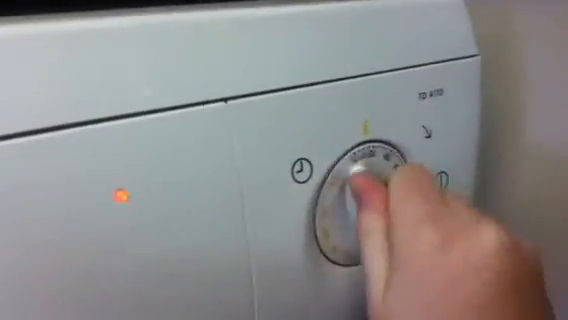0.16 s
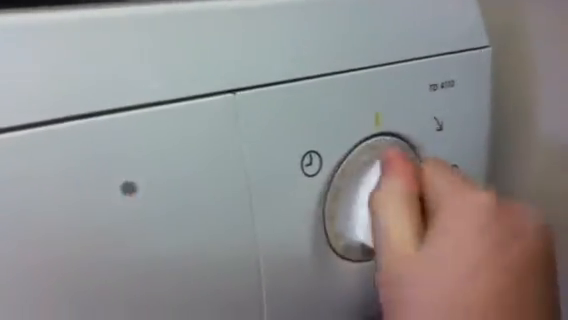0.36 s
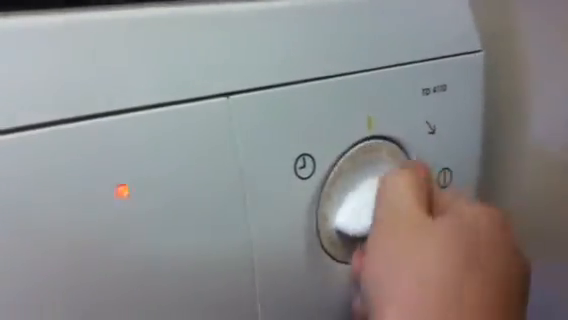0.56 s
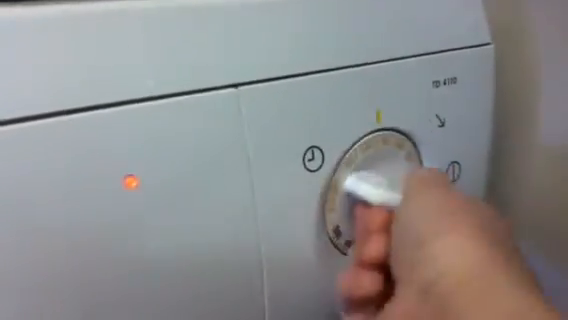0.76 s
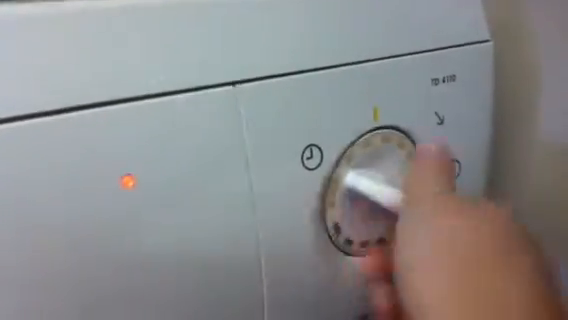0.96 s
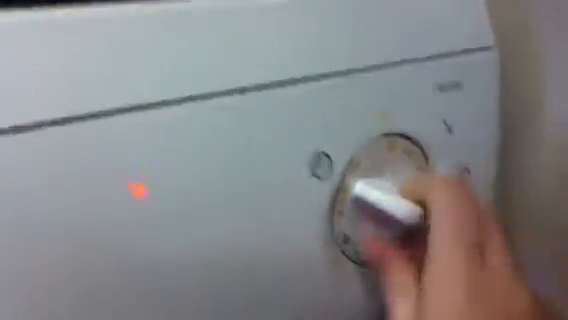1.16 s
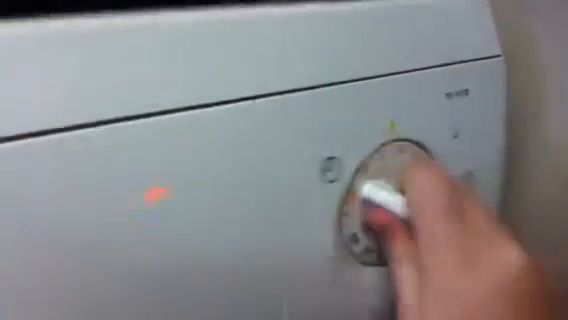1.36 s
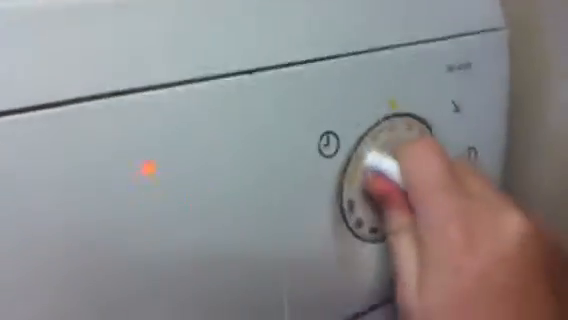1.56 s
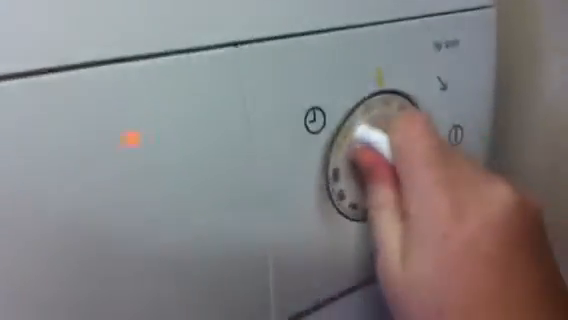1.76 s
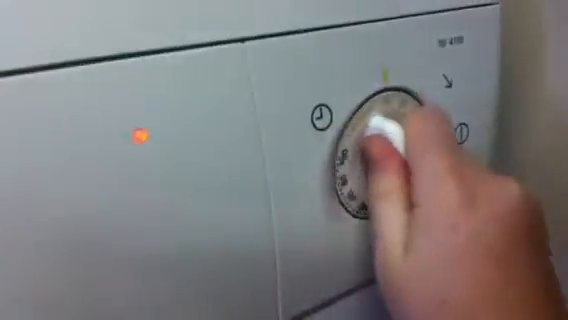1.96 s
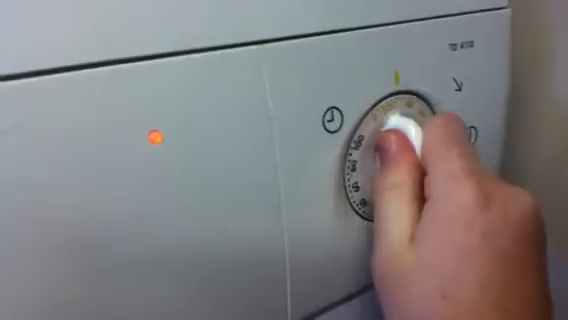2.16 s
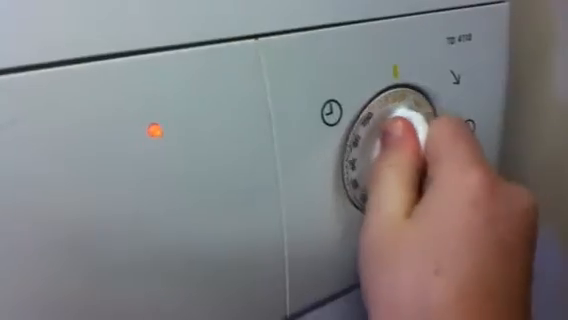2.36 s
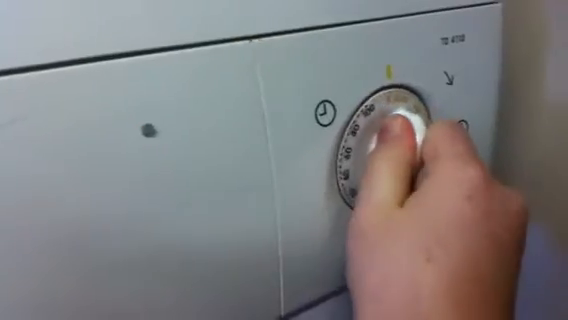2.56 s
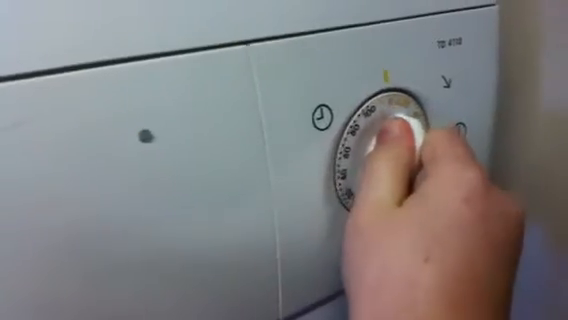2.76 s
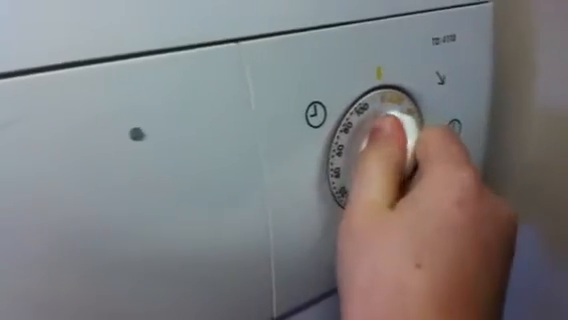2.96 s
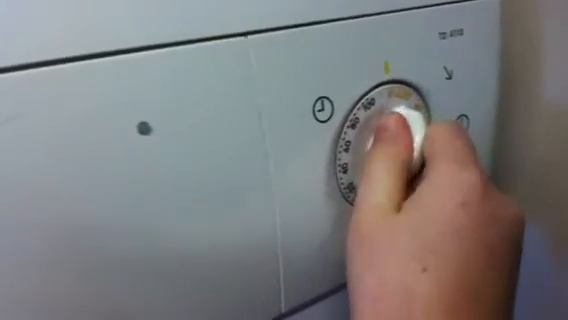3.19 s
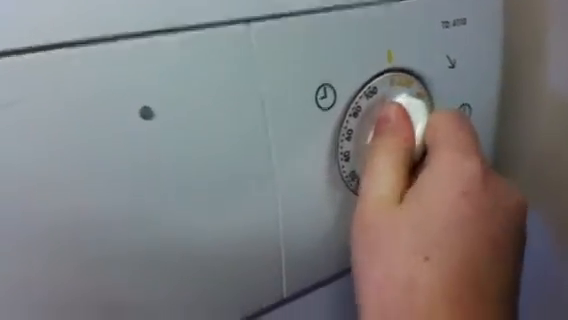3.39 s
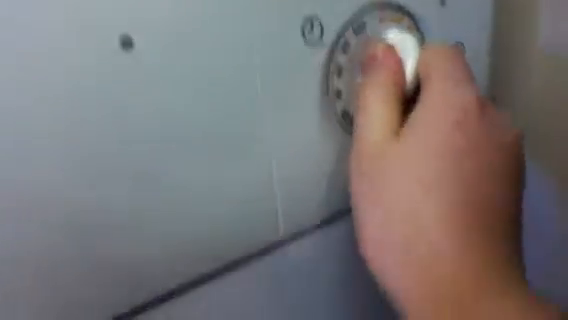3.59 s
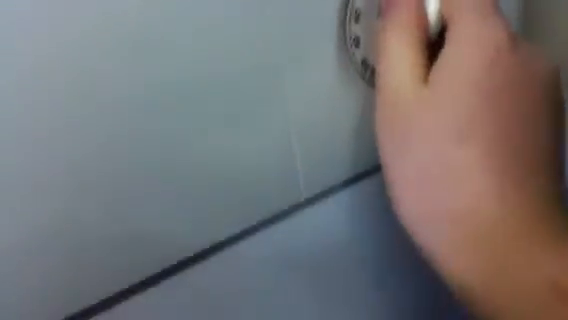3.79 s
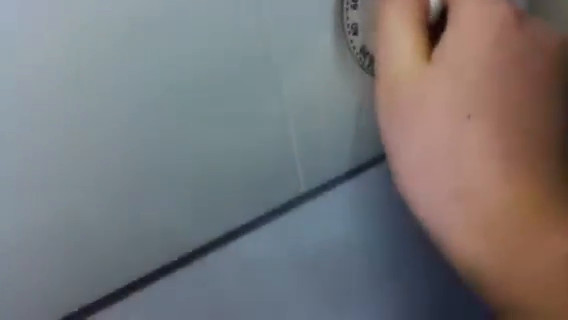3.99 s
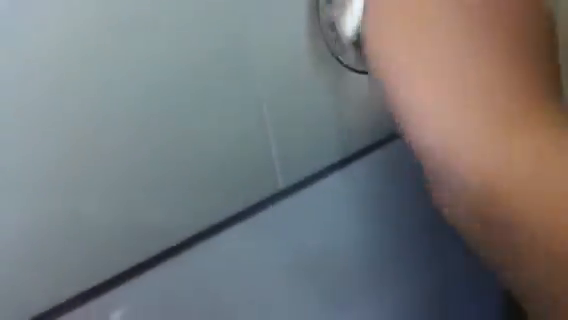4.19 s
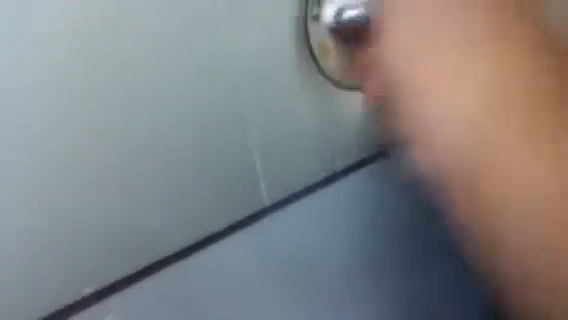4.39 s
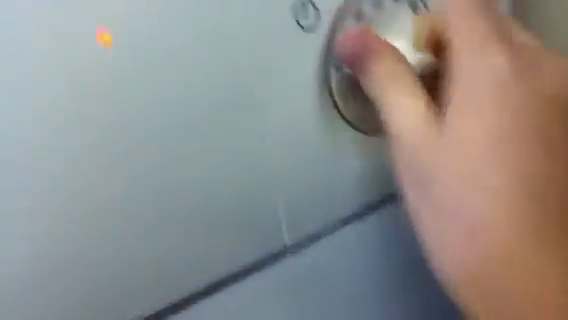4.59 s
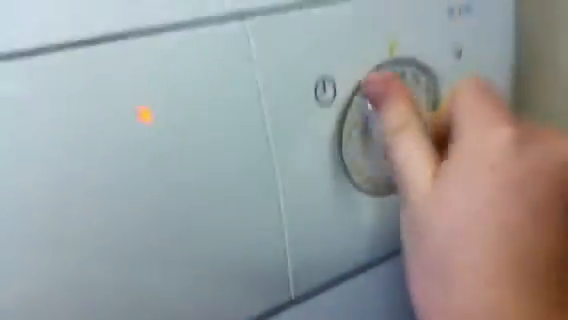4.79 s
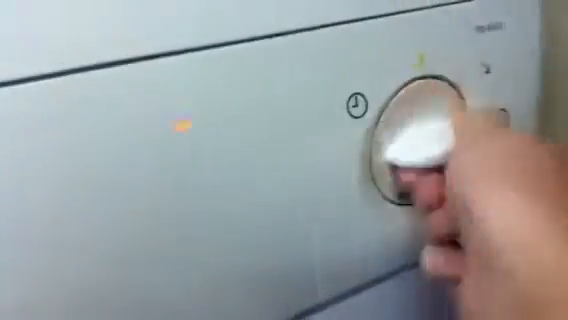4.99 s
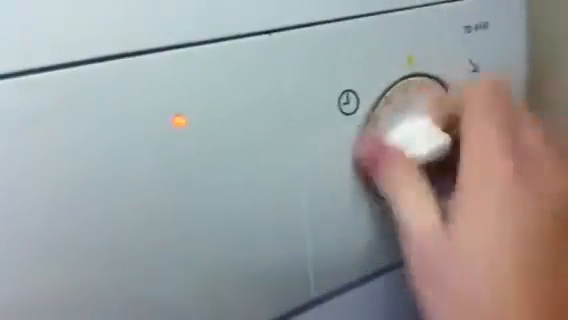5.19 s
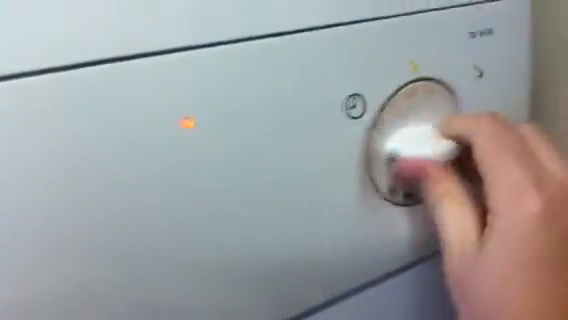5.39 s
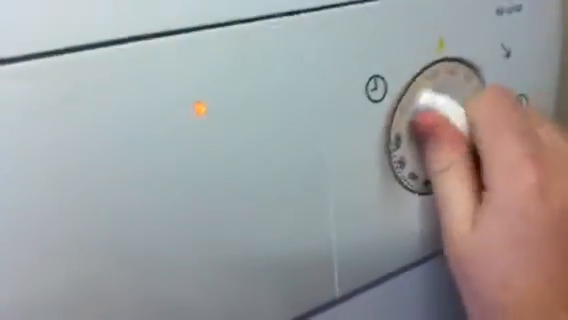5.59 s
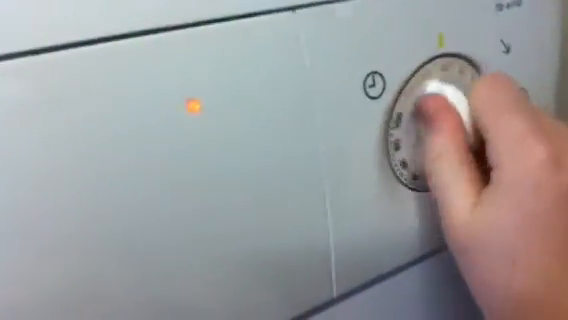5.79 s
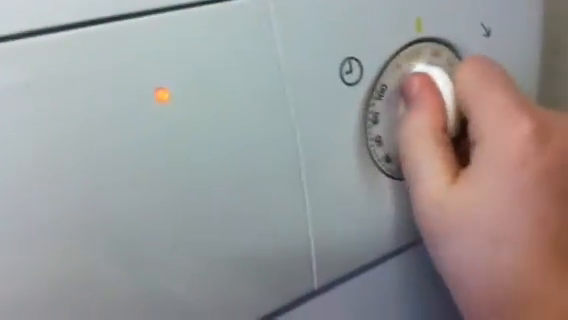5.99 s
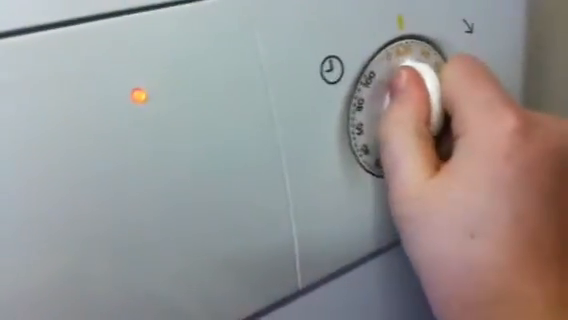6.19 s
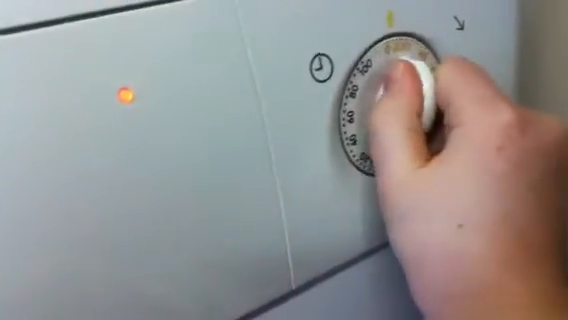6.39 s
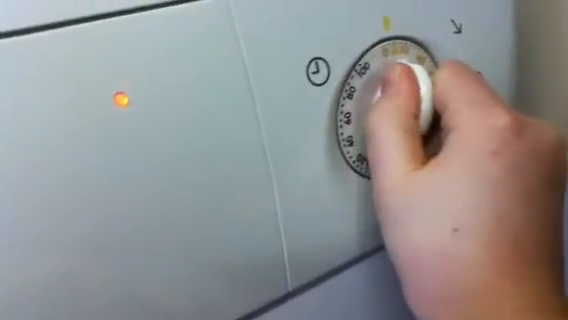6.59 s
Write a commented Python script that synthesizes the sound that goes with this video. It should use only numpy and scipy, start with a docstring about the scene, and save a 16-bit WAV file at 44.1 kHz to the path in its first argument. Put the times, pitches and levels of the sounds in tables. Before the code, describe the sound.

Close to a sheet-metal laundry appliance in a quiet room, fingers rub and tap a dial, then a rapid ratchet run clatters. After a regrip, slower, separate clicks end with one loud snap. A pause with only faint room hush follows, then very fast bursts of clicks alternate with rubs and taps, finally slowing to spaced clicks.

```python
"""Skin rubs a knob and two light finger taps land, in a quiet room; then a pawl clicks rapidly over ratchet teeth.
A hand is turning the timer dial of a sheet-metal laundry appliance, in single clicks and fast runs.
Each snap and tap excites noise bands and decaying modes that ring the knob, the panel and the cabinet.
Between turns the fingers slide and tap as they regrip: strokes are shaped noise, and so is the room.
A thin sine tone fades in once after a snap and dies slowly."""
import sys
import numpy as np
from scipy import signal
from scipy.fft import rfft, irfft, next_fast_len
from scipy.io import wavfile
from scipy.ndimage import map_coordinates

SR = 44100
rng = np.random.default_rng(int(sys.argv[2]) if len(sys.argv) > 2 else 0)


def to_linear_factor(level_db):
    """Convert decibel levels (scalar or array-like) to linear amplitude factors."""
    exponent = np.asarray(level_db, float) / 20
    return 10 ** exponent


def int16_out(signal):
    """Quantize to a 16-bit WAV file."""
    q = np.round(np.clip(np.atleast_2d(signal).T, -1, 1) * 32767)
    wavfile.write(sys.argv[1], SR, q.astype(np.int16))


N = 293265  # length in samples


def unit(x):
    """Scale x to rms 1."""
    return x / np.sqrt(np.mean(x ** 2) + 1e-20)


def hiss(spectrum):
    """Noise of rms 1, coloured by a curve of (frequency, level) points."""
    size = next_fast_len(N)
    hz, db = np.transpose(spectrum)
    bin_hz = np.fft.rfftfreq(size, 1 / SR)
    gain = to_linear_factor(np.interp(np.log(bin_hz + 1), np.log(hz), db, right=-120))
    white = rng.standard_normal(size)
    return unit(irfft(rfft(white) * gain, size)[:N])


def wobble(rate_hz):
    """Smooth random curve through rate_hz random knots a second."""
    knots = rng.standard_normal(int(N * rate_hz / SR) + 4)
    return map_coordinates(knots, [np.arange(N) * rate_hz / SR])


# Colour of the quiet room and microphone hiss: pitch_hz, relative_level_db (per Hz)
ROOM_COLOUR = [(15, -31), (25, -7.5), (53, -2), (76, -5), (326, -8.5), (416, -12), (503, -14.5),
               (1260, -20), (1400, -20), (3620, -26), (16000, -29)]


def room_hush():
    """Steady coloured noise of the still room, its level drifting slightly."""
    level_db = -59.5 + 0.6 * wobble(13)
    return to_linear_factor(level_db) * hiss(ROOM_COLOUR)


# Strokes of skin on the knob: start_s, end_s, rub_db and hiss_db (before trims), change_db (over the stroke)
STROKES = [(0.0, 0.123, -33, -45.5, -16), (1.0, 1.257, -42.5, -51, 1), (1.297, 1.6, -50, -56, 7),
           (4.11, 4.217, -57.5, -63, 3), (4.447, 4.54, -31, -34, -13), (4.562, 4.83, -42, -47.5, -2),
           (5.12, 5.304, -30, -54, -7), (5.34, 5.485, -45, -59, 2)]
# Colour of the dull rub: pitch_hz, relative_level_db (per Hz)
RUB_COLOUR = [(100, -7.5), (200, 7), (500, -5), (1200, -10), (2500, -15), (4000, -60.5)]
# Colour of the skin's faint hiss: pitch_hz, relative_level_db (per Hz)
SKIN_COLOUR = [(1000, -23.5), (2500, -6.5), (6000, -4.5), (10000, -15), (15000, -23.5)]


def skin_slides():
    """Skin drags unevenly over the knob: a dull rub and a faint hiss swell and sag together."""
    fade_s = 0.022  # before and after each stroke
    rub_uneven_db, hiss_uneven_db = 3.5, 1.5
    t, rub, fizz = np.arange(N) / SR, np.zeros(N), np.zeros(N)
    for start, end, rub_db, hiss_db, change_db in STROKES:
        edge = np.clip(np.minimum(t - start, end - t) / fade_s + 1, 0, 1)
        progress = np.clip((t - start) / (end - start), 0, 1)
        press = edge * to_linear_factor(change_db * progress)
        rub += press * to_linear_factor(rub_db)
        fizz += press * to_linear_factor(hiss_db)
    drag = wobble(60)
    dull = rub * to_linear_factor(-9.5 + rub_uneven_db * drag) * hiss(RUB_COLOUR)
    bright = fizz * to_linear_factor(-13 + hiss_uneven_db * drag) * hiss(SKIN_COLOUR)
    return dull + bright


def spread(rows, colour_db, lift_db):
    """Rows of time and the level each of the five parts receives, varying from blow to blow."""
    start_s, strength_db = np.transpose(rows)[:2]
    chance_db = 2 * rng.standard_normal((len(rows), len(colour_db)))
    return np.column_stack([start_s, strength_db[:, None] + colour_db + lift_db + chance_db])


# Where crack, pawl, knob, panel and cabinet sound: pitch_hz
PART_HZ = [7200, 4800, 1670, 635, 250]


def blows(rows, hz, scatter_db):
    """Impulse train of the blows' strength at one frequency, blended between the parts' levels."""
    level_db = [np.interp(-np.log(hz), -np.log(PART_HZ), parts) for s, *parts in rows]
    level_db = level_db + scatter_db * rng.standard_normal(len(rows))
    train = np.zeros(N)
    train[[round(row[0] * SR) for row in rows]] = to_linear_factor(level_db)
    return train


def dying(x, t60):
    """Each impulse of x becomes an exponential that falls to a thousandth in t60 seconds."""
    return signal.lfilter([1], [1, -to_linear_factor(-60 / (t60 * SR))], x)


# Dense rattle by band: pitch_hz, level_db, quick_t60_s (before hold), linger_db, linger_t60_s
RATTLE_BANDS = [(90, -21, 0.27, -14.5, 1), (206.4, 0.5, 0.017, -10.5, 0.94), (388, -0.5, 0.075, -13, 0.59),
                (764, -3, 0.13, -4, 0.36), (1510, 0, 0.11, -12, 0.29), (2450, -5, 0.026, -6.5, 0.24),
                (4470, -2, 0.094, -13, 0.19), (6637, -6, 0.049, -24.5, .2), (11300, -15, 0.066, -36.5, .16),
                (13500, -42, .03, -27, .14)]


def rattle(rows, spike_db, hold):
    """Countless close modes: noise in each band spikes, dies fast, then lingers in cabinet and room."""
    spike_s, rise_s = 0.028, 0.005
    width = 1.338  # band edges as a ratio to the centre
    out = np.zeros(N)
    # Power falls 30 dB where its envelope falls to a thousandth, hence the halved t60 values
    for hz, db, quick, late_db, late in RATTLE_BANDS:
        impact = blows(rows, hz, scatter_db=1.5) ** 2
        # Smear the blow so the rattle swells in instead of jumping
        power = dying(impact, rise_s) / (rise_s * SR / np.log(1000))
        treble_tilt = hz / (hz + 3000)  # the bare impact is bright
        spike = to_linear_factor(2 * spike_db) * treble_tilt * dying(power, spike_s / 2)
        quick_tail = dying(power, hold * quick / 2)
        late_tail = to_linear_factor(2 * late_db) * dying(power, late / 2)
        envelope = np.sqrt(spike + quick_tail + late_tail)
        edges = [hz / width, min(hz * width, SR * 0.45)]
        band = signal.butter(2, edges, "bandpass", fs=SR, output="sos")
        size = np.std(signal.sosfilt(band, rng.standard_normal(SR)))  # evens out bandwidths
        out += to_linear_factor(db) / size * signal.sosfilt(band, envelope * rng.standard_normal(N))
    return out


def mode(kicks, hz, t60):
    """One resonance: every kick starts a sine that decays by 60 dB in t60 seconds."""
    radius, turn = to_linear_factor(-60 / (t60 * SR)), 2 * np.pi * hz / SR
    return np.sin(turn) * signal.lfilter([1], [1, -2 * radius * np.cos(turn), radius * radius], kicks)


# Modes of dial and cabinet: pitch_hz, level_db, t60_s (before hold)
MODES = [(169.7, -9.5, 0.32), (201.9, -3, 0.24), (293.8, -10.5, 0.35), (347, -7.5, .3),
         (382.8, -13.5, 0.26), (451.6, -30, 1.6), (497.3, -16, 0.24), (612, -18, .6), (650.7, -4.5, 0.15),
         (802, -14, 0.032), (926, -14, 0.048), (1115, -10, 0.091), (1370, -13, 0.11), (1583, -9.5, 0.2),
         (1761, -12, 0.069), (1925, -4.5, 0.067), (2150, -8.5, 0.072), (2332, -10.5, 0.091),
         (2474, -17, 0.14), (3090, -3, 0.052), (3337, -14, 0.14), (3740, -16, 0.04), (4180, -6.5, 0.032),
         (4430, -2.5, 0.018), (4667, 1.5, 0.023), (4870, -6.5, .025), (5457, -8.5, .035), (6372, -7, 0.027),
         (7260, -17.5, 0.043), (8000, -13, 0.0088)]


def rings(rows, hold):
    """Each blow pushes every mode for a few cycles, at a new strength and in either direction."""
    push_cycles = 14
    out = np.zeros(N)
    for hz, db, t60 in MODES:
        kicks = blows(rows, hz, scatter_db=3) * np.sign(rng.standard_normal(N))
        # Taking away a quicker-dying copy softens the attack
        out += to_linear_factor(db) * (mode(kicks, hz, hold * t60) - mode(kicks, hz, push_cycles / hz))
    return out


# Finger taps on the knob: start_s, strength_db, nail_sharpness_db, thud_db (weighted by part)
TAPS = [(0.084, -37.5, -0.5, 1), (0.097, -26, -25, 1.5), (1.051, -30, -14, 0.5), (1.068, -22, -16, 0),
        (1.098, -19.5, -24.5, -0.5), (1.137, -31.5, -7.5, -2), (1.237, -22.5, -16, 0),
        (1.25, -9, -24.5, -4.5), (1.276, -22.5, -4, -2), (1.474, -19.5, -15.5, -0.5),
        (1.535, -15.5, -18.5, -5), (3.626, -62, 13, -7.5), (4.173, -44.5, -10.5, 7), (4.23, -31, 6, 4.5),
        (4.457, -19, -18.5, 6), (4.53, -32, -5, 0), (4.562, -39.5, -11, 4), (5.155, -18, -11.5, -0.5),
        (5.209, -24.5, -21, 6.5), (5.235, -21, -24, -4), (5.289, -15.5, -10, -3), (5.397, -26.5, -33.5, 7),
        (5.442, -21.5, -17, 2)]
# How a tap spreads to crack, pawl, knob, panel and cabinet: level_db (over its strength)
TAP_COLOUR = [-2, -2.5, -5, -1, -6.5]


def finger_taps():
    """Nail and fingertip shake the dial's parts; a resting finger shortens the ringing."""
    nail_db, thud_db = np.transpose(TAPS)[2:]
    nail = np.outer(nail_db, [0.59, 0.79, 0.18, 0.19, 0.18])
    thud = np.outer(thud_db, [0, 0, 0, 0.4, 1])
    tap = spread(TAPS, TAP_COLOUR, nail + thud)
    return to_linear_factor(-6) * rattle(tap, spike_db=-0.5, hold=0.96) + to_linear_factor(-1.5) * rings(tap, hold=0.55)


def seating(times):
    """How fully the pawl had seated, 0-1, from the pause before each snap."""
    full_seat_s = 0.14
    return np.clip(np.diff(times, prepend=0) / full_seat_s, 0, 1)


def bounced(rows):
    """Every snap, the faint tick as the pawl starts to slip off, and one duller rebound on the tooth."""
    bounce_s, slip_s = 0.011, 0.003
    bounce_db = [-17, -12, -8, -8.5, -9.5]  # crack, pawl, knob, panel, cabinet
    slip_db = -17
    chance = rng.standard_normal((len(rows), 3))
    again = rows + [0, *bounce_db] + 2 * chance[:, :1]
    again[:, 0] = rows[:, 0] + bounce_s * np.exp(0.15 * chance[:, 1])
    before = rows + slip_db + 3 * chance[:, 2:]
    before[:, 0] = rows[:, 0] - slip_s
    return np.vstack([rows, again, before])


# Pawl snaps: start_s, strength_db, knob_share_db, body_share_db (shares weighted by part)
SNAPS = [(0.1469, -11.5, -9, -13), (0.1507, -12, -5.5, -15), (0.1876, -9.5, -7, -14.5),
         (0.1955, -9.5, -5.5, -16.5), (0.2246, -9.5, -7.5, -16.5), (0.2456, -10, -4.5, -16.5),
         (0.2659, -10, -4, -18.5), (0.2874, -8.5, -4.5, -11.5), (0.3115, -10, -8.5, -13),
         (0.3451, -8.5, -11, -13.5), (0.3619, -6.5, -11.5, -22), (0.3895, -7.5, -10.5, -14.5),
         (0.413, -7, -14, -13.5), (0.4475, -7, -10, -18), (0.4712, -7.5, -12.5, -16),
         (0.5099, -7, -13, -19), (0.5524, -10, -7, -15.5), (0.5594, -5.5, -18, -19.5),
         (0.598, -11, -9.5, -16), (0.633, -14.5, -5.5, -8), (0.6535, -9.5, -11, -18.5),
         (0.671, -6, -13, -21), (0.6905, -8.5, -12, -20.5), (0.7087, -7.5, -10.5, -19),
         (0.7329, -10.5, -7, -19.5), (0.7551, -5.5, -13.5, -17), (0.7778, -11.5, -10.5, -13.5),
         (0.815, -7.5, -11, -18), (0.836, -7.5, -17, -19.5), (0.857, -7, -13.5, -18),
         (0.8774, -7.5, -11, -16), (0.9062, -8.5, -11.5, -14.5), (0.9462, -10.5, -8, -18.5),
         (1.6302, -7, -10.5, -20), (1.705, -6, -9, -20.5), (1.8604, -7.5, -8.5, -21),
         (1.943, -6, -11.5, -20.5), (2.0309, -8, -13.5, -18.5), (2.0826, -8.5, -14, -20.5),
         (2.147, -12, -8.5, -19.5), (2.2032, -9.5, -11.5, -19.5), (2.2641, -9.5, -10.5, -21.5),
         (2.3577, -12, -15, -13.5), (2.4015, -8, -12.5, -24.5), (2.4735, -9.5, -14.5, -15.5),
         (2.5147, -9, -9.5, -17.5), (2.5884, -7, -14.5, -18), (2.7711, -2, -16, -23.5),
         (4.2693, -3, -15.5, -20), (4.2837, -1, -22.5, -21), (4.2974, -11.5, -8.5, -17.5),
         (4.3178, -12, -10.5, -14.5), (4.3243, -7, -13.5, -21.5), (4.3304, -8.5, -12.5, -16),
         (4.344, -4, -18, -16), (4.3562, -6, -6.5, -16.5), (4.366, -7, -15, -20),
         (4.3785, -3.5, -15.5, -19), (4.4052, -6.5, -13, -33), (4.804, -11.5, -8, -15.5),
         (4.8181, -12, -9, -11), (4.8372, -12.5, -5, -15), (4.8634, -11, -8.5, -13),
         (4.8852, -11.5, -0.5, -15), (4.8925, -11.5, -5.5, -14), (4.9187, -10, -6, -20),
         (4.9244, -10, -6.5, -13), (4.9324, -12, -7, -12), (4.9503, -10.5, -2.5, -14.5),
         (4.9554, -10, -6, -17.5), (4.9681, -5.5, -14, -20), (4.9825, -14, -14, -12),
         (4.9857, -10.5, -11.5, -20.5), (4.9944, -7.5, -11, -18.5), (5.0262, -9, -15, -20.5),
         (5.032, -2.5, -12.5, -22), (5.0474, -18.5, -4.5, -18), (5.053, -13.5, -6.5, -26),
         (5.0613, -7.5, -9, -22), (5.0754, -14, -7, -14), (5.0831, -15, -15, -16),
         (5.0897, -6.5, -17.5, -28), (5.5041, -10, -8.5, -21.5), (5.5095, -7.5, -10, -16),
         (5.5273, -10.5, -9, -18.5), (5.5364, -8.5, -8.5, -16.5), (5.5482, -10, -16.5, -19.5),
         (5.5555, -5, -13.5, -32.5), (5.5945, -13, -10.5, -16.5), (5.6075, -10, -15, -18),
         (5.6331, -5.5, -15, -17), (5.6412, -18.5, -7, -14.5), (5.672, -8.5, -14, -17.5),
         (5.7888, -11.5, -8, -16), (5.8407, -8.5, -13, -15.5), (5.9031, -12.5, -7.5, -14.5),
         (5.9715, -12.5, -9.5, -15), (6.0226, -11, -10, -16), (6.143, -13, -10, -11.5),
         (6.222, -6.5, -10, -16), (6.422, -11.5, -8.5, -12.5), (6.4768, -9, -11, -18.5)]
# How a snap spreads to crack, pawl, knob, panel and cabinet: level_db (over its strength)
SNAP_COLOUR = [-0.5, -3, 3.5, 3, 3.5]


def pawl_snaps():
    """A sprung pawl snaps over teeth; after a rest it is fully seated, snaps sharper and rings louder."""
    start_s, _, knob_db, body_db = np.transpose(SNAPS)
    knob = np.outer(knob_db, [0.35, 0.25, 1, 0.44, 0.052])
    body = np.outer(body_db, [0, 0.025, 0.086, 0.78, 1])
    snap = spread(SNAPS, SNAP_COLOUR, knob + body)
    seated = seating(start_s)
    latest = np.clip(np.searchsorted(start_s, np.arange(N) / SR) - 1, 0, None)  # snap heard at each sample
    spike_db = 5.0 + 3 * seated[latest]
    # First column is time, so it gets no lift
    ringing = snap + np.outer(3 * seated, [0, 0.6, 0.98, 0.068, 0.24, 0.031])
    clatter = to_linear_factor(-7.5) * rattle(bounced(snap), spike_db, hold=0.92)
    return clatter + to_linear_factor(-3.0) * rings(ringing, hold=0.82)


# Thin tone after one snap, a single row: start_s, pitch_hz, level_db, t60_s
THIN_TONE = (2.6, 5954, -52, .36)


def thin_ring():
    """A faint, slightly wavering high sine that fades in and dies slowly."""
    start_s, hz, db, t60 = THIN_TONE
    t = np.clip(np.arange(N) / SR - start_s, 0, None)
    decay = to_linear_factor(db - 60 * t / t60 + 1.5 * wobble(40))
    fade_in = 1 - np.exp(-t / 0.012)
    return decay * fade_in * np.sin(2 * np.pi * hz * t)


def scene():
    """Room, fingers and dial mixed to one channel."""
    mix = room_hush() + skin_slides() + finger_taps() + pawl_snaps() + thin_ring()
    return mix[None]


def low_pass(x):
    """Removes everything above the highest recorded frequency."""
    return signal.sosfilt(signal.butter(12, 16650, fs=SR, output="sos"), x)


def record(dry):
    """The small recorder rounds off its loudest peaks and thins deep bass and top treble."""
    soft = dry / (1 + np.abs(dry / 0.72) ** 5) ** (1 / 5)
    soft = signal.sosfilt(signal.butter(2, [28, 15000], "bandpass", fs=SR, output="sos"), soft)
    soft = signal.sosfilt(signal.butter(10, 15600, fs=SR, output="sos"), soft)
    return low_pass(soft)


dry = scene()
out = record(dry)
int16_out(out)
```